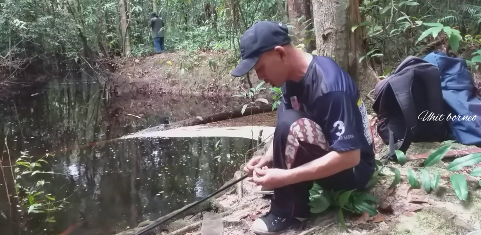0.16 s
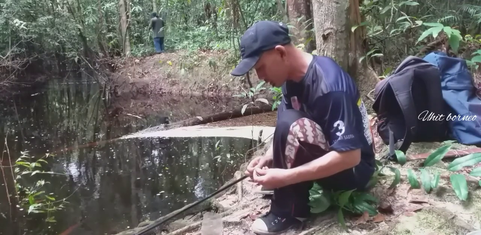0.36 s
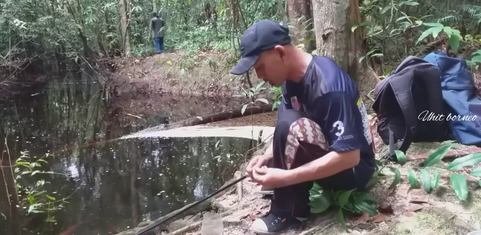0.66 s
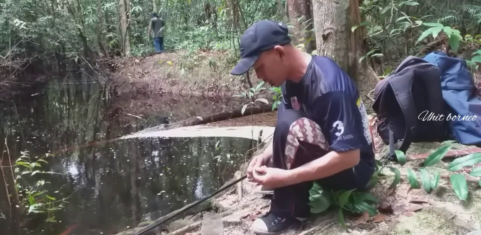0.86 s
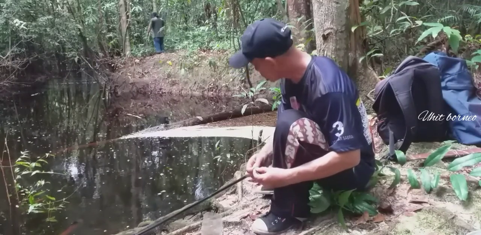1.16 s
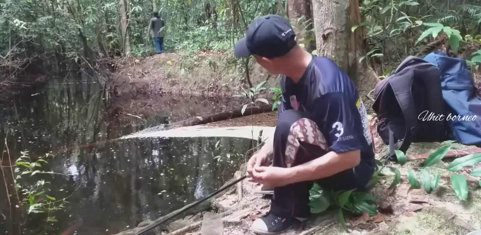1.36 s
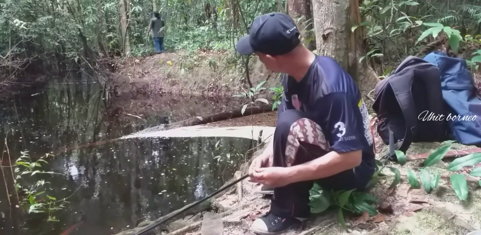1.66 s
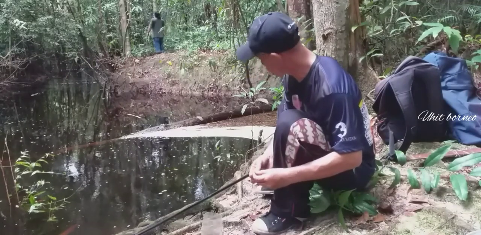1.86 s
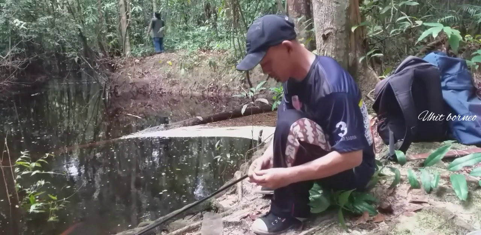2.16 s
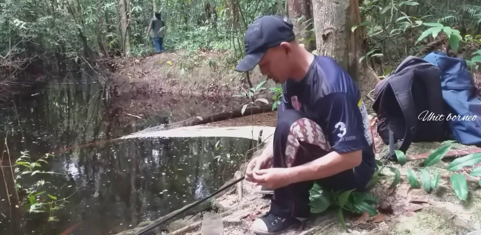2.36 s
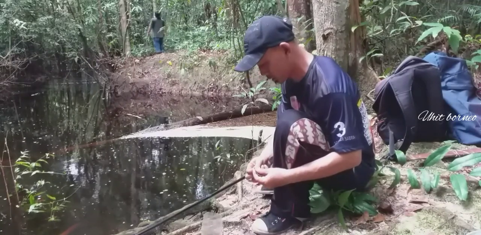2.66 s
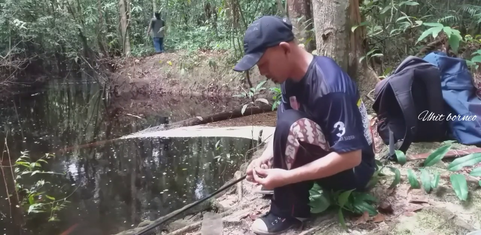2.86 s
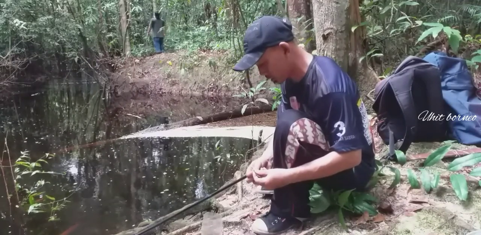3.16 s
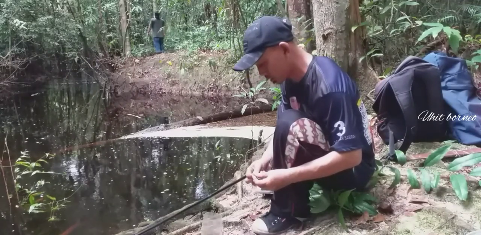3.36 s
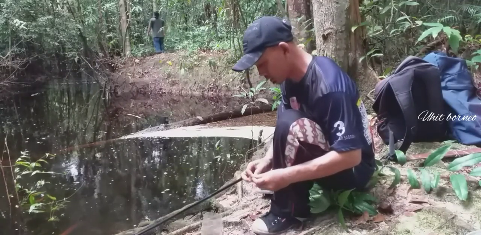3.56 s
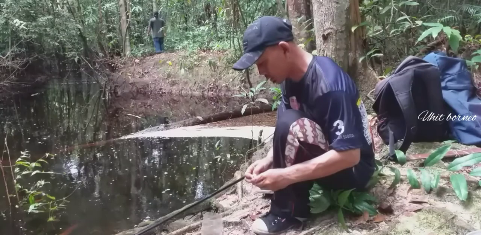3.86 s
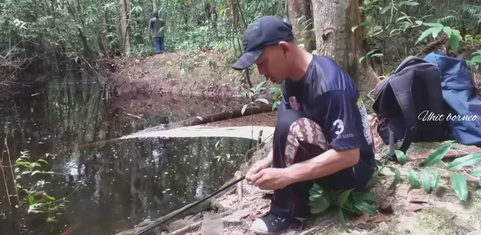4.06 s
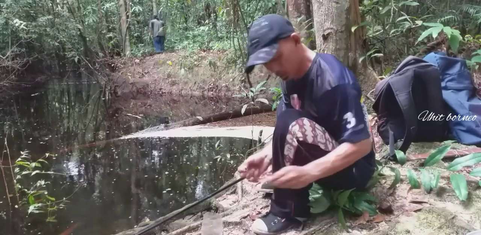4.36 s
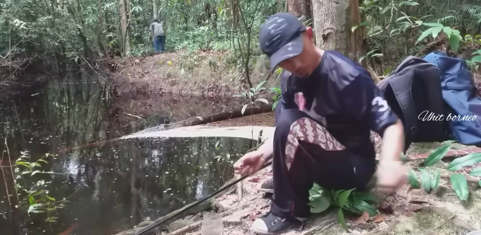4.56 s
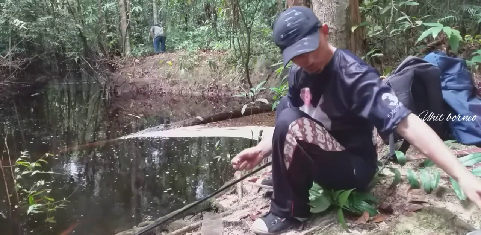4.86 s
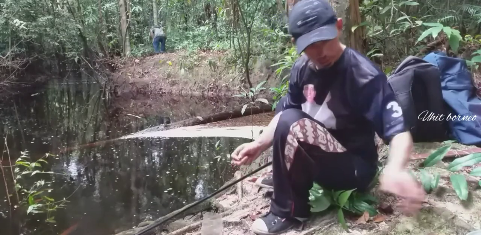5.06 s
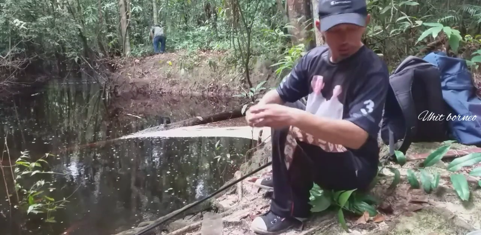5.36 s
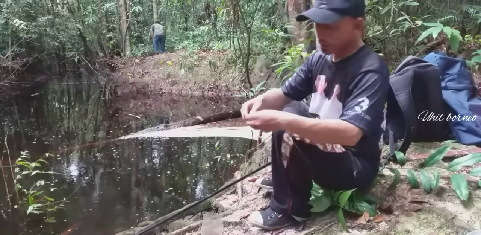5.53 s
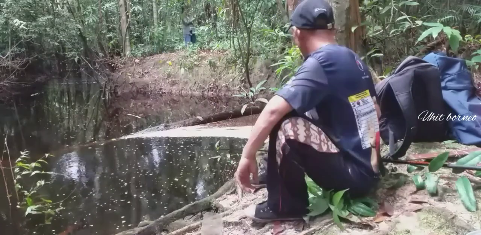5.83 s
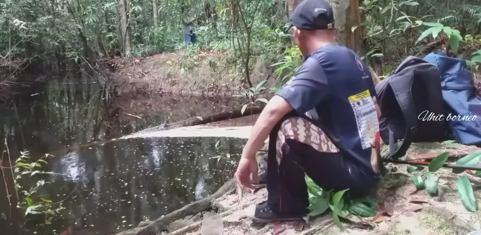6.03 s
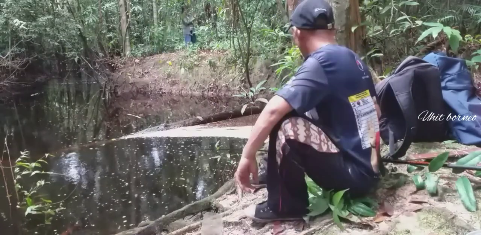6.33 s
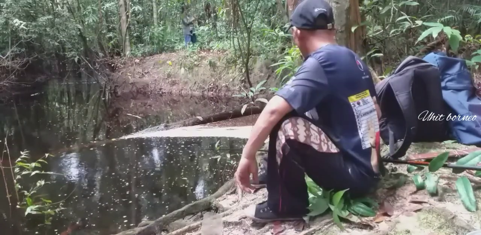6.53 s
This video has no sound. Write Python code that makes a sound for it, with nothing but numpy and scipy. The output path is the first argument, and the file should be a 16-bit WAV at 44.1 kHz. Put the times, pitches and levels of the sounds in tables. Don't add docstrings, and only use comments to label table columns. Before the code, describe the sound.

Throughout, a dense chorus of far cicadas drones steadily at a shrill pitch around 6 to 7 kHz, with a fainter octave above and a low bed of air and microphone hiss. From 0 to 1 s there are very faint far calls, a tiny bubble-like glide and a soft leaf swell. Thin, very high katydid rasps come at about 1.2, 1.65, 2.0 and 2.5 s; a leaf gust rises at 1.5 s, and a bird gives one quick chirp, falling then jumping higher, at 1.95 to 2.1 s. A light plastic touch comes at 3.4 s and a faint second insect sizzle near 4.1 s. At 4.9 to 5.05 s, close plastic snaps and crackles sharply with a hollow tub scrape and knocks. Smaller rustles and a twangy click follow around 5.4 s, a dry tap at 5.8 s, and the sizzle returns from 6.3 s until the end at 6.7 s. Mono, with diffuse forest echo.

```python
import sys
import numpy as np
from scipy import signal
from scipy.io import wavfile
from scipy.ndimage import uniform_filter1d

SR = 44100
rng = np.random.default_rng(int(sys.argv[2]) if len(sys.argv) > 2 else 0)


def voltage_ratio(decibels):
    exponent = np.asarray(decibels, float) / 20
    return 10 ** exponent


def to_wav(s):
    ch = np.atleast_2d(s).T
    pcm = np.round(np.clip(ch, -1, 1) * 32767)
    wavfile.write(sys.argv[1], SR, pcm.astype(np.int16))


N = 295029

# (frequency [Hz], density [dB/Hz])
RING_COLOUR = [(2710, -74), (4600, -36.5), (5400, -26.5), (6240, -3), (6610, 3.5), (6930, -1.5),
               (8210, -18), (8730, -23.5), (9600, -41.5), (12500, -69), (21100, -120)]
# (frequency [Hz], density [dB/Hz])
OCTAVE_COLOUR = [(6590, -45.5), (11200, -26), (11800, -16.5), (12800, -1.5), (13100, 1), (13700, 0.5),
                 (15600, -20.5)]
# (time [s], level [dB])
CHORUS_EFFORT = [(0, -0.5), (.9, -0.5), (2.1, 0.06), (3.2, 0.45), (3.8, 0.46), (4.9, 0.4), (5.5, 0.9),
                 (5.8, -0.4), (6.69, -1.1)]
RING_DB, OCTAVE_DB, OCTAVE_GROWTH = -45, -55, 1.5
THROB_HZ, THROB_DEPTH = 73, 0.088

# (frequency [Hz], density [dB/Hz])
AIR_COLOUR = [(21, -45), (35, -21.5), (97, 4), (134, -3.5), (218, -14.5), (267, -11.5), (308, -14.5),
              (453, -16.5), (738, -20), (1020, -21.5), (1150, -21.5), (2400, -22.5), (4500, -22.5),
              (5850, -69), (9900, -120)]
AIR_DB, HISS_DB = -73.5, -77
# (peak time [s], level [dB], rise [dB/s], fall [dB/s])
LEAF_GUSTS = [
    (.85, -77.5, 1.5, 50),
    (1.5, -75, 65, 12),
    (3.9, -84.5, 37, 0),
]
# (frequency [Hz], density [dB/Hz])
LEAF_COLOUR = [(300, -39), (1500, -16.5), (3000, -8), (4500, -4.5), (7000, -18), (20000, -90)]

# (time [s], length [s], pitch [Hz], fuzz width [Hz], level [dB])
FAINT_CALLS = [(0.045, 0.088, 2100, 160, -82), (.28, 0.089, 2250, 100, -94), (0.431, 0.037, 1900, 400, -79),
               (0.522, 0.017, 1900, 600, -77.5), (0.636, 0.07, 720, 140, -77), (.66, 0.054, 2520, 200, -84),
               (0.706, .11, 1860, 260, -77.5), (1.527, 0.034, 1840, 150, -82), (1.643, .12, 2270, 250, -83),
               (2.245, 0.052, 4230, 150, -76), (2.251, 0.14, 3960, 600, -80), (2.949, 0.1, 4450, 1400, -72),
               (5.396, 0.086, 607, 120, -80.5)]
CALL_SAG = 0.039
# (time [s], length [s], start [Hz], end [Hz], level [dB])
GLIDES = [
    (.346, .06, 150, 560, -67),
    (4.862, .045, 1770, 1800, -76),
]

# (time [s], level [dB], length [s])
RASPS = [
    (1.177, -48, 0.13),
    (1.648, -47.5, 0.11),
    (1.978, -47, 0.1),
    (2.456, -47, 0.11),
]
# (frequency [Hz], width [Hz], level [dB])
WING_MODES = [(15500, 3100, 4), (12900, 2300, -5), (14300, 500, -4.5), (11900, 260, -14.5)]
SLIDE_START_HZ, SLIDE_END_HZ, SLIDE_WIDTH_HZ = 13700, 9700, 2400

# (time [s], peak [dB], centre [Hz])
SNAPS = [(1.4, -47, 5160), (4.8005, -46, 10000), (4.9118, -27, 12000), (4.9131, -23, 13500),
         (4.9179, -25, 11000), (4.921, -32, 8950), (4.9466, -37, 4770), (4.9775, -41, 4500),
         (4.977, -46, 9000), (4.9961, -38, 4500), (5.045, -38, 11000), (5.1059, -48, 4000),
         (5.218, -49, 9000), (5.3628, -50, 11500), (5.4, -49, 11000), (5.424, -48, 3020),
         (5.468, -51, 12000)]
# (time [s], peak [dB], centre [Hz])
TWANGS = [
    (4.912, -38.5, 3960),
    (4.9169, -27, 6900),
    (4.917, -27, 10550),
    (4.9192, -19, 7500),
    (4.919, -27, 13600),
    (5.1697, -54, 4970),
    (5.3822, -33.5, 4670),
    (5.461, -47, 11000),
]
# (time [s], peak [dB], centre [Hz])
TAPS = [
    (3.418, -54, 3000),
    (4.882, -52, 3000),
    (5.0452, -50, 3500),
    (5.7988, -43.5, 4500),
]
SNAP_WIDTH, TWANG_WIDTH, TAP_WIDTH = 0.27, 0.14, 1

# (time [s], pitch [Hz])
CHIRP = [
    [(1.943, 7450), (1.975, 7420), (1.995, 7150), (2.014, 6680), (2.026, 6680), (2.04, 7050)],
    [(2.038, 7930), (2.056, 8165), (2.068, 8320), (2.088, 8345), (2.106, 8340)],
]
# (start [dB], end [dB], share of note in attack and release)
NOTE_LEVELS = [
    (-44, -36.5, 0.2),
    (-33, -39.5, 0.35),
]
# (delay [s], level [dB])
NEAR_TRUNKS = [(.004, -15), (0.01, -9), (0.019, -12), (.026, -16), (.038, -2.5)]

# (peak time [s], level [dB], rise [dB/s], fall [dB/s])
RUSTLES = [
    (3.42, -66.5, 155, 60),
    (5.345, -57, 450, 62),
    (5.384, -51.5, 350, 113),
    (5.424, -55.5, 300, 300),
    (5.5, -74, 150, 42),
]
# (peak time [s], level [dB], rise [dB/s], fall [dB/s])
SCRUNCHES = [
    (4.806, -68, 198, 43),
    (4.914, -53, 1400, 114),
    (4.946, -42, 600, 300),
    (4.998, -60, 1000, 480),
    (5.024, -59.5, 400, 67),
]
# (frequency [Hz], density [dB/Hz])
RUSTLE_COLOUR = [(400, -24), (1200, -28), (2200, -13.5), (3400, -11), (4300, -7.5), (5100, -7), (6000, -11),
                 (10000, -16), (15500, -16)]
# (frequency [Hz], density [dB/Hz])
SCRUNCH_COLOUR = [(400, -31), (1000, -21), (2200, -11), (3400, -7.5), (4500, -4), (5600, -1), (6500, -4.5),
                  (10000, -16), (15500, -17)]
CRACKLES_PER_S = 24000

# (peak time [s], level [dB], rise [dB/s], fall [dB/s])
SIZZLE_SPELLS = [
    (4.06, -69, 45, 60),
    (6.33, -70, 220, -8),
]
SIZZLE_HZ, SIZZLE_WIDTH_HZ = 11250, 1300

# (frequency [Hz], level [dB], decay scale [s]; each mode falls 60 dB in 0.36 of it)
TUB_MODES = [(420, -14.5, 0.9), (510, -23, 0.39), (700, -1, 0.046), (937, -21, 0.2), (1203, -13, 0.16),
             (1360, -19, 0.31), (1870, -41, 0.34), (2100, -14, 0.073)]
# (peak time [s], level [dB], rise [dB/s], fall [dB/s])
SCRAPE = [
    (4.94, -60, 700, 280),
    (4.984, -45, 302, 323),
]
# (time [s], peak [dB], panel pitch [Hz])
BUMPS = [(4.91, -52, 1430), (4.914, -58, 2100), (4.914, -69, 700), (4.937, -47.5, 630), (4.937, -54, 2060),
         (4.952, -43, 2190), (4.953, -45.5, 1950), (4.956, -49, 1390), (4.966, -49, 1225),
         (4.976, -48, 692), (4.978, -52, 898), (4.984, -51.5, 503), (4.995, -48.5, 2820),
         (5.001, -52, 2310), (4.99, -56, 420), (5.02, -63, 420)]
PANEL_T60_S, PANEL_DAMPING = 0.089, 0.76

# (frequency [Hz], T60 [s])
FOREST_T60 = [(500, 0.34), (4000, 0.62), (8000, 0.74), (12000, 0.97), (16000, 0.3)]
EDGE_HZ = 15740


def evened(x):
    return x / np.sqrt(np.mean(x ** 2) + 1e-20)


def read(points, hz):
    f, value = np.transpose(points)
    return np.interp(np.log(hz + 1), np.log(f + 1), value)


def add(mix, time_s, sound):
    part = mix[round(time_s * SR):][:len(sound)]
    part += sound[:len(part)]


def swells(rows):
    peak_s, db, rise, fall = np.transpose(rows)[:, :, None]
    late_s = np.arange(N) / SR - peak_s
    gains = voltage_ratio(db + np.where(late_s < 0, rise, -fall) * late_s)
    return np.sqrt(np.sum(gains ** 2, axis=0))


def resonate(x, hz, width_hz):
    turn = np.exp(2j * np.pi * np.cumsum(hz * np.ones(len(x))) / SR)
    r = np.exp(-np.pi * width_hz / SR)
    return 2 * (turn * signal.lfilter([1 - r], [1, -r], x / turn)).real


def resonate_twice(x, hz, width_hz):
    return resonate(resonate(x, hz, width_hz), hz, width_hz)


def ping(hz, width_hz, length):
    u = 2 * np.pi * width_hz * np.arange(length) / SR
    ring = u ** 2 * np.exp(-u) * np.sin(hz * u / width_hz)
    return ring / abs(ring).max()


def crackle(spread_db):
    size, when, sign = rng.exponential(1, N), rng.random(N), rng.standard_normal(N)
    return voltage_ratio(spread_db * np.minimum(size, 4)) * (when < CRACKLES_PER_S / SR) * sign


def high_pass(x, hz, order):
    return signal.sosfilt(signal.butter(order, hz, "high", fs=SR, output="sos"), x)


def wash(colour, patchy_db):
    frames, hz = N // 256 + 5, np.fft.rfftfreq(1024, 1 / SR)
    a, b, patches = rng.standard_normal((frames, 513, 3)).T
    patches = uniform_filter1d(patches, size=10, axis=0)
    patches = evened(uniform_filter1d(patches, size=14, axis=1))
    z = (a + 1j * b) * voltage_ratio(read(colour, hz)[:, None] + patchy_db * patches)
    return evened(signal.istft(z, nperseg=1024, noverlap=768)[1][:N])


def cicadas():
    drift = evened(uniform_filter1d(rng.standard_normal(N), size=8000))
    throb_hz = THROB_HZ * (1 + 0.048 * drift)
    throb = 1 + THROB_DEPTH * np.sin(2 * np.pi * np.cumsum(throb_hz) / SR)
    effort_db = np.interp(np.arange(N) / SR, *np.transpose(CHORUS_EFFORT))
    ring = voltage_ratio(RING_DB + effort_db) * wash(RING_COLOUR, patchy_db=0.54)
    octave = voltage_ratio(OCTAVE_DB + OCTAVE_GROWTH * effort_db) * wash(OCTAVE_COLOUR, patchy_db=0.9)
    return ring + throb * octave


def air():
    return voltage_ratio(AIR_DB) * wash(AIR_COLOUR, patchy_db=0.66) + voltage_ratio(HISS_DB) * rng.standard_normal(N)


def faint_calls():
    out = np.zeros(N)
    for time_s, length_s, pitch_hz, width_hz, db in FAINT_CALLS:
        n = round(length_s * SR)
        hz = pitch_hz * (1 + CALL_SAG * np.linspace(0.5, -0.5, n))
        call = evened(resonate_twice(rng.standard_normal(n), hz, width_hz))
        shape = signal.windows.tukey(n, 0.25) * voltage_ratio(np.linspace(2.5, -4, n))
        add(out, time_s, voltage_ratio(db) * call * shape)
    return out


def glides():
    out = np.zeros(N)
    for time_s, length_s, start_hz, end_hz, db in GLIDES:
        u = np.linspace(0, 1, round(length_s * SR))
        hz = start_hz + (end_hz - start_hz) * u ** 1.31
        tone = np.sin(2 * np.pi * np.cumsum(hz) / SR)
        add(out, time_s, voltage_ratio(db + 8.0) * tone * np.sin(np.pi * u ** 0.52))
    return out


def leaves():
    return swells(LEAF_GUSTS) * wash(LEAF_COLOUR, patchy_db=1.8)


def katydid():
    out = np.zeros(N)
    for time_s, db, length_s in RASPS:
        n = round(length_s * SR)
        teeth = rng.standard_normal(n)
        slide_hz = np.linspace(SLIDE_START_HZ, SLIDE_END_HZ, n)
        slide = evened(resonate_twice(teeth, slide_hz, SLIDE_WIDTH_HZ))
        wing = sum(voltage_ratio(mode_db) * evened(resonate_twice(teeth, hz, width_hz))
                   for hz, width_hz, mode_db in WING_MODES)
        add(out, time_s, voltage_ratio(db) * evened(wing + voltage_ratio(-3.5) * slide) * np.hanning(n) ** 0.54)
    return out


def snaps():
    out = np.zeros(N)
    for rows, share in (SNAPS, SNAP_WIDTH), (TWANGS, TWANG_WIDTH), (TAPS, TAP_WIDTH):
        for time_s, db, hz in rows:
            add(out, time_s, voltage_ratio(db) * ping(hz, share * hz, length=400))
    return out


def bird():
    out = np.zeros(N)
    for note, (start_db, end_db, edges) in zip(CHIRP, NOTE_LEVELS):
        time_s, hz = np.transpose(note)
        t = np.arange(time_s[0], time_s[-1], 1 / SR)
        phase = 2 * np.pi * np.cumsum(np.interp(t, time_s, hz)) / SR
        shape = voltage_ratio(np.linspace(start_db, end_db, len(t))) * signal.windows.tukey(len(t), edges)
        add(out, time_s[0], np.sqrt(2) * shape * np.sin(phase))
    return out


def trunk_reflections(x):
    out = x.copy()
    for delay_s, db in NEAR_TRUNKS:
        add(out, delay_s, voltage_ratio(db) * x)
    return out


def bag():
    clicks, crease = crackle(spread_db=3.0), rng.integers(0, 24, N)
    pitches_hz = np.geomspace(700, 15000, 24)
    rings = []
    for k, hz in enumerate(pitches_hz):
        ring = evened(ping(hz, 0.089 * hz, length=800))
        rings.append(signal.oaconvolve(clicks * (crease == k), ring)[:N])

    def coloured(colour):
        return evened(voltage_ratio(read(colour, pitches_hz)) * np.sqrt(pitches_hz) @ np.array(rings))

    return swells(RUSTLES) * coloured(RUSTLE_COLOUR) + swells(SCRUNCHES) * coloured(SCRUNCH_COLOUR)


def sizzle():
    buzz = resonate_twice(rng.standard_normal(N), SIZZLE_HZ, SIZZLE_WIDTH_HZ)
    return swells(SIZZLE_SPELLS) * evened(buzz)


def tub():
    drive = swells(SCRAPE) * evened(crackle(spread_db=2.5))
    t = np.arange(SR // 3) / SR
    body = sum(voltage_ratio(db - 60 * t / (0.36 * t60_s)) * np.sin(2 * np.pi * hz * t)
               for hz, db, t60_s in TUB_MODES)
    out = voltage_ratio(-6.5) * signal.fftconvolve(drive, body / np.linalg.norm(body))[:N]
    for time_s, db, hz in BUMPS:
        t60_s = PANEL_T60_S * (1000 / hz) ** PANEL_DAMPING
        attack = np.minimum(t / 0.0017, 1)
        add(out, time_s, voltage_ratio(db - 60 * t / t60_s) * np.sin(2 * np.pi * hz * t) * attack)
    return out


def forest(x):
    taps = np.zeros(SR)
    at = np.arange(200, SR - 20, 20)
    taps[at + rng.integers(0, 20, len(at))] = rng.choice([-1., 1.], len(at))
    hz, t, z = signal.stft(taps, SR, nperseg=256)
    decay = voltage_ratio(-60 * t / read(FOREST_T60, hz)[:, None])
    tail = signal.istft(z * decay, SR, nperseg=256)[1]
    return signal.fftconvolve(x, tail / np.linalg.norm(tail))[:N]


def scene():
    far = high_pass(katydid(), 11000, order=4) + faint_calls()
    song, glide = bird(), glides()
    near = high_pass(bag() + snaps() + tub(), 296, order=3)
    echo = forest(voltage_ratio(-1.0) * far + voltage_ratio(-2.0) * song + voltage_ratio(-16.0) * near + voltage_ratio(-5.5) * glide)
    background = cicadas() + air() + leaves() + sizzle()
    mono = background + far + voltage_ratio(-1.0) * trunk_reflections(song) + near + glide + echo
    return np.array([mono, mono])


def top_cut(x):
    return signal.sosfilt(signal.butter(12, 15730, fs=SR, output="sos"), x)


def record(dry):
    low_pass = signal.firwin(511, EDGE_HZ, window=("kaiser", 9), fs=SR)
    limited = signal.oaconvolve(dry, low_pass[None], "same")
    ends = signal.windows.tukey(N, 0.0012)
    rounding = high_pass(voltage_ratio(-78.0) * rng.standard_normal(dry.shape), 710, order=1)
    mix = high_pass(limited * ends, 45, order=2) + rounding
    return top_cut(mix)


dry = scene()
out = record(dry)
to_wav(out)
```